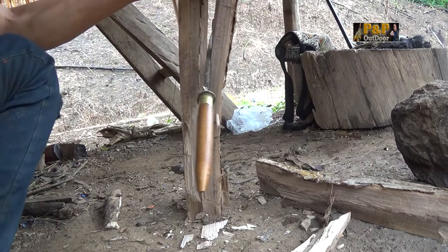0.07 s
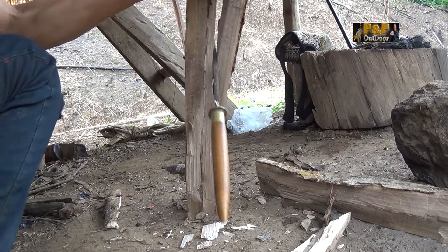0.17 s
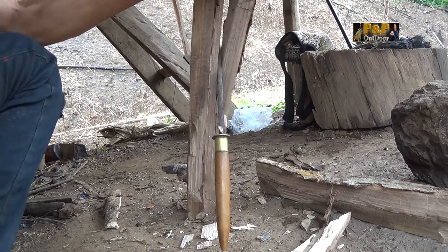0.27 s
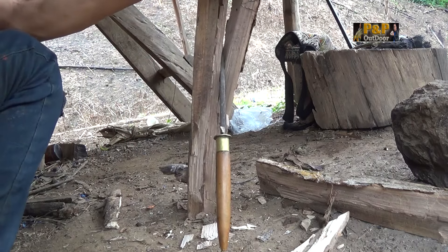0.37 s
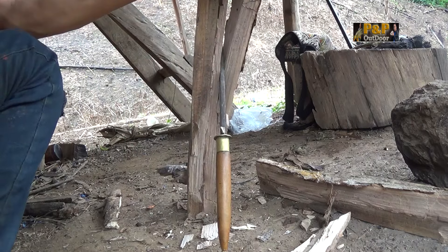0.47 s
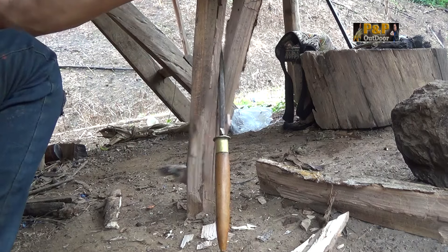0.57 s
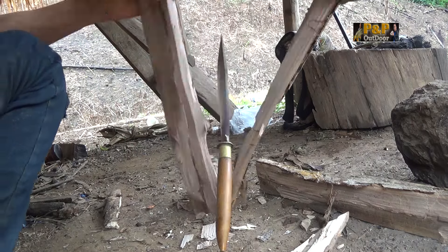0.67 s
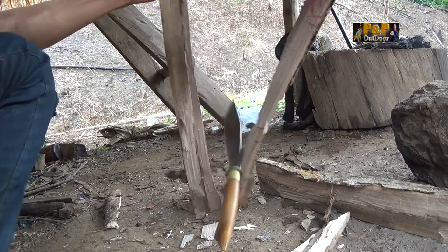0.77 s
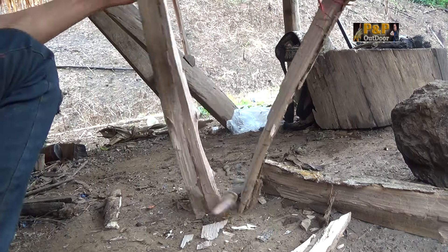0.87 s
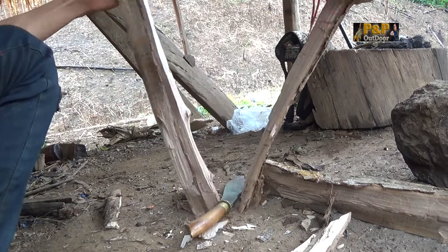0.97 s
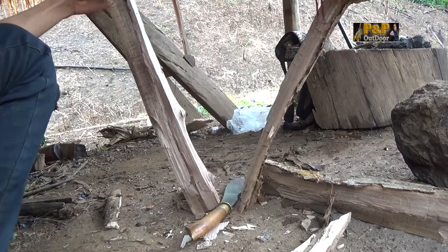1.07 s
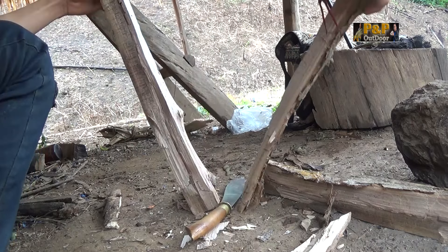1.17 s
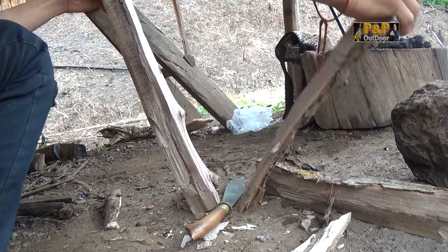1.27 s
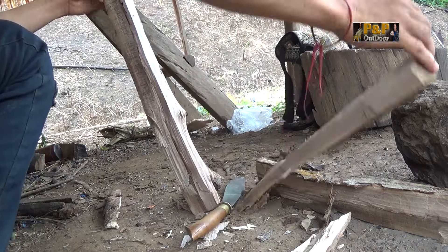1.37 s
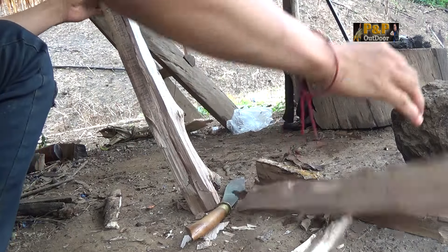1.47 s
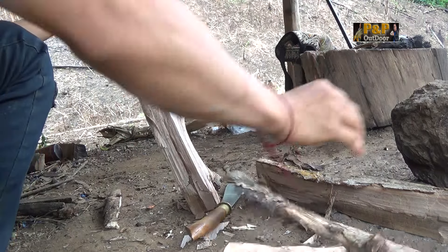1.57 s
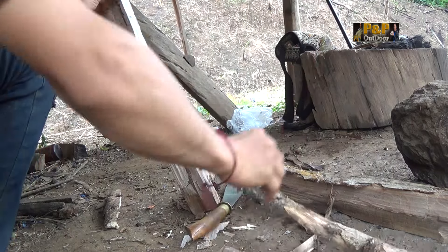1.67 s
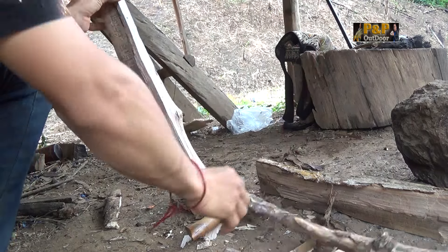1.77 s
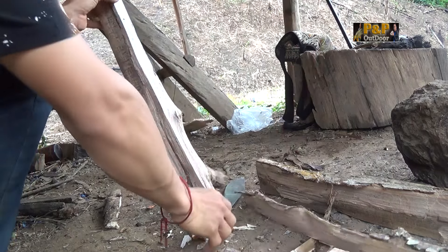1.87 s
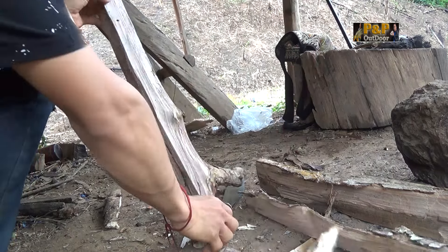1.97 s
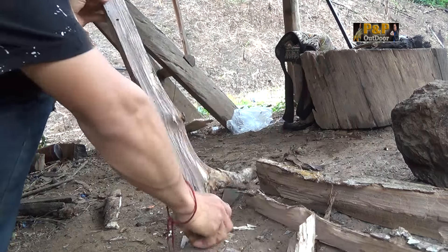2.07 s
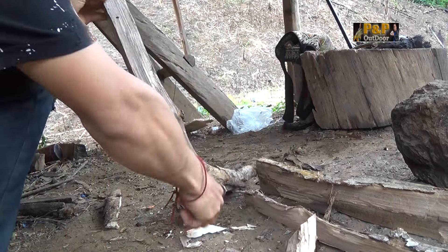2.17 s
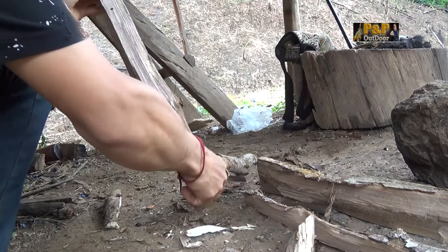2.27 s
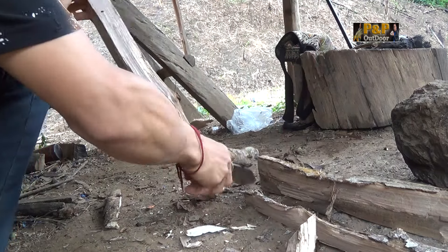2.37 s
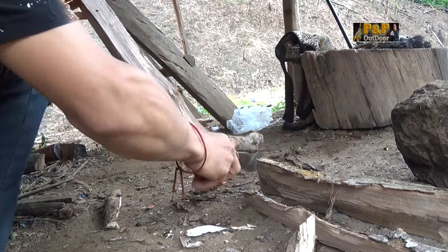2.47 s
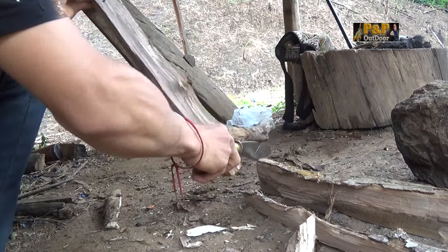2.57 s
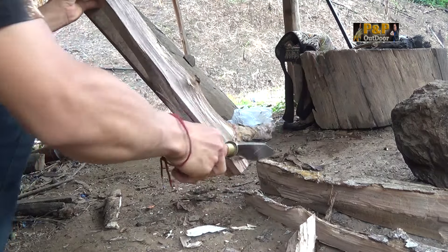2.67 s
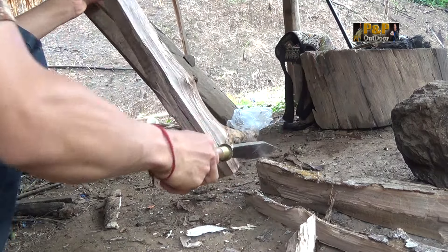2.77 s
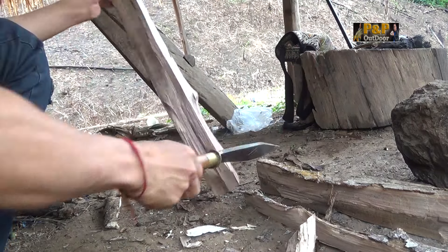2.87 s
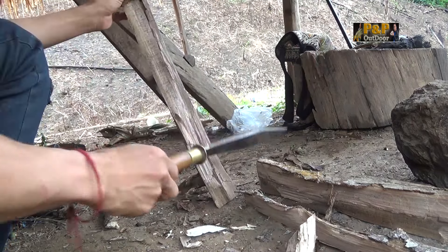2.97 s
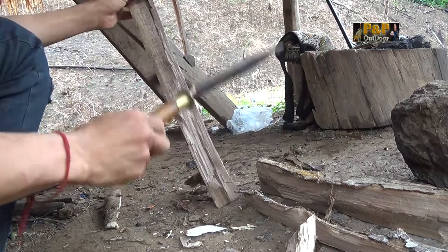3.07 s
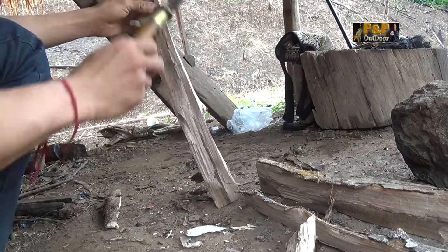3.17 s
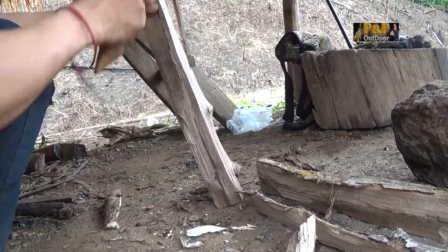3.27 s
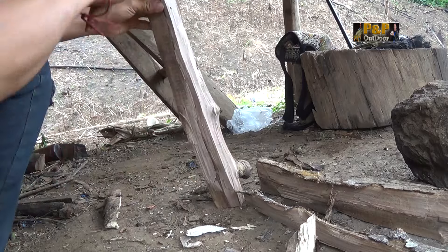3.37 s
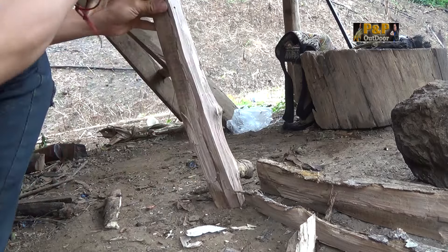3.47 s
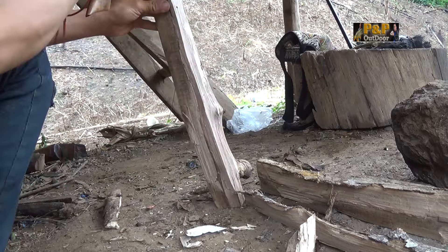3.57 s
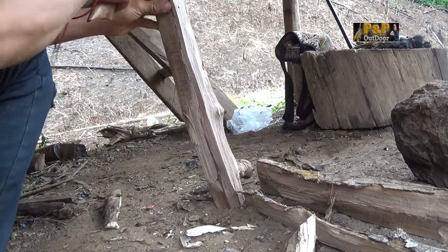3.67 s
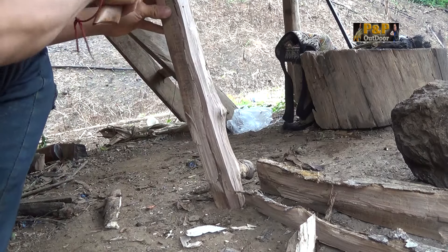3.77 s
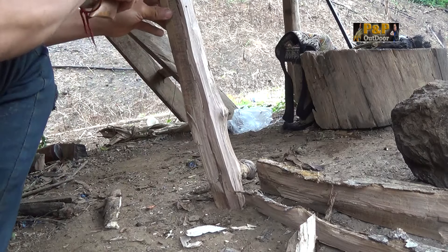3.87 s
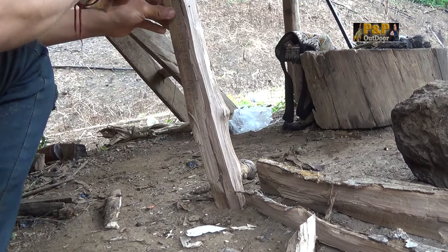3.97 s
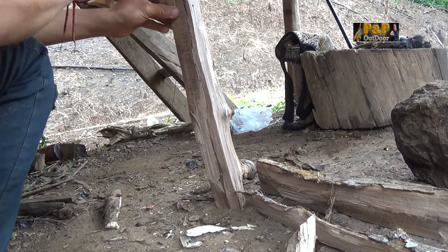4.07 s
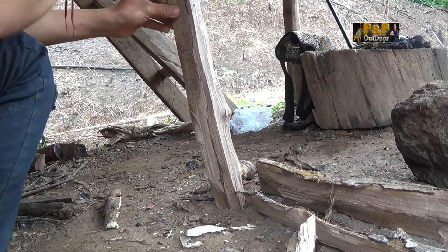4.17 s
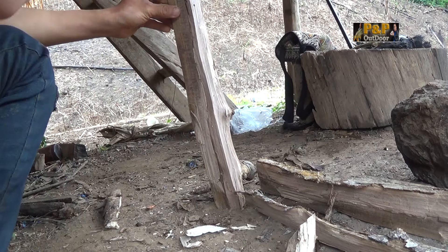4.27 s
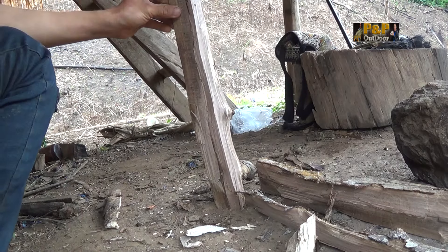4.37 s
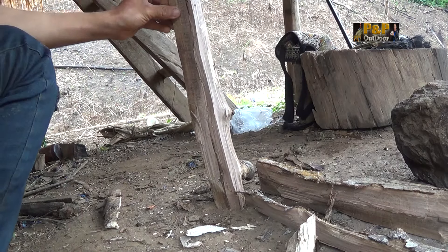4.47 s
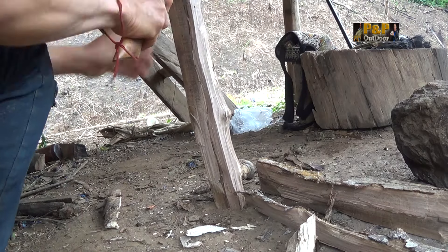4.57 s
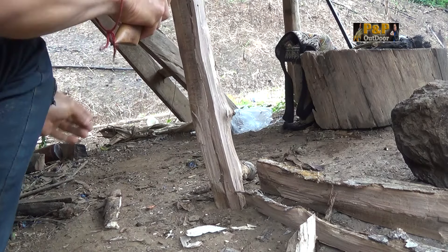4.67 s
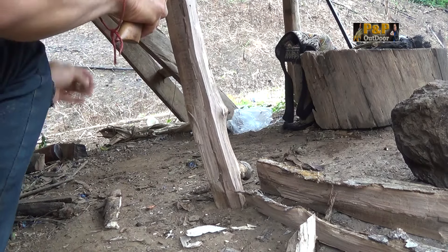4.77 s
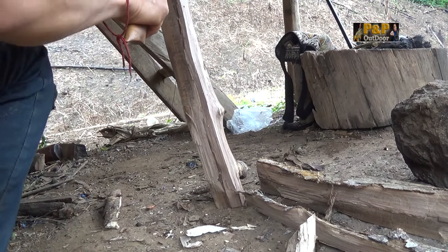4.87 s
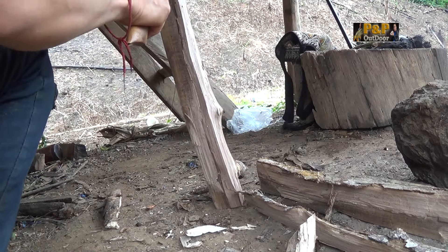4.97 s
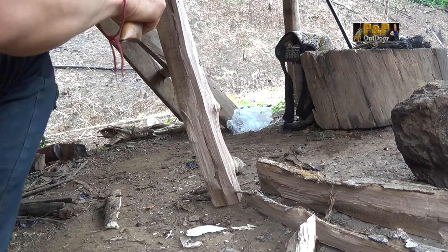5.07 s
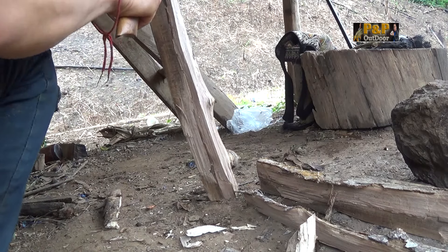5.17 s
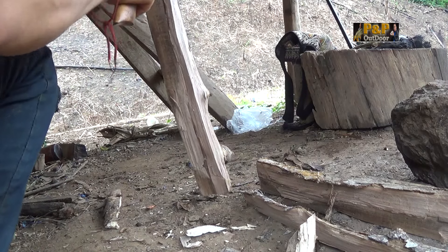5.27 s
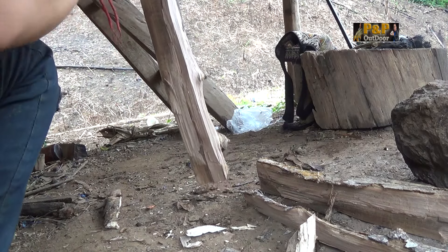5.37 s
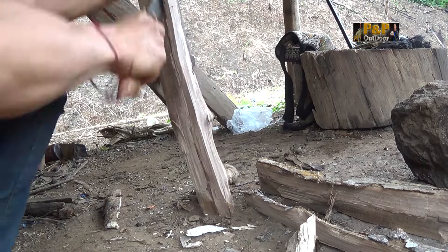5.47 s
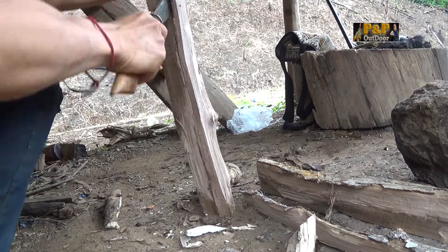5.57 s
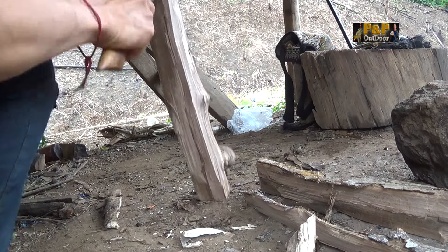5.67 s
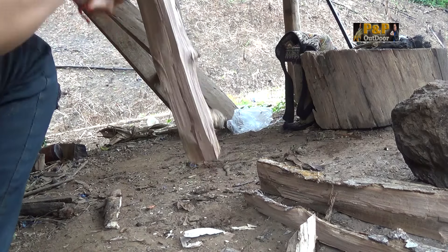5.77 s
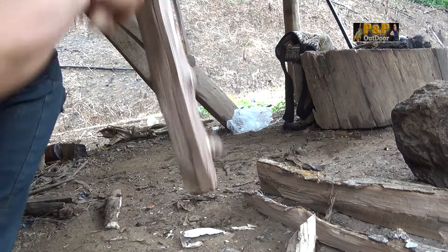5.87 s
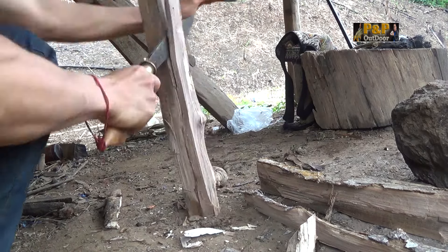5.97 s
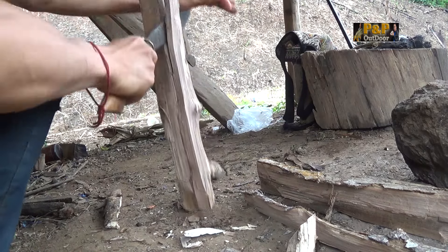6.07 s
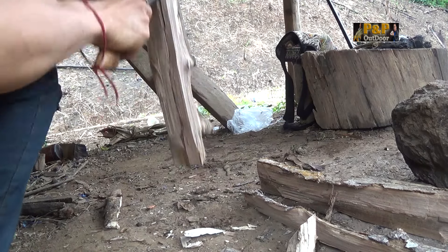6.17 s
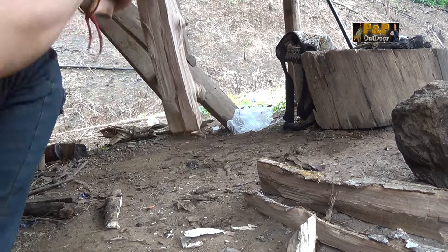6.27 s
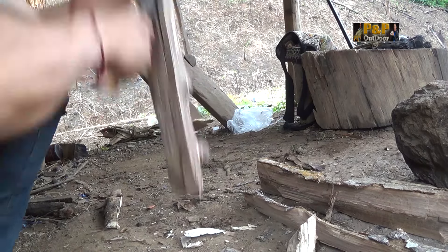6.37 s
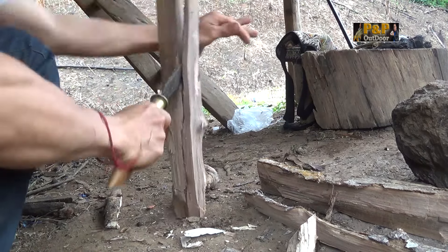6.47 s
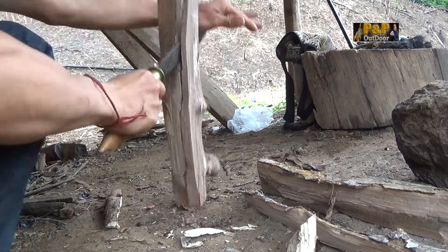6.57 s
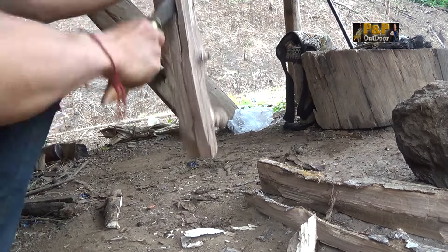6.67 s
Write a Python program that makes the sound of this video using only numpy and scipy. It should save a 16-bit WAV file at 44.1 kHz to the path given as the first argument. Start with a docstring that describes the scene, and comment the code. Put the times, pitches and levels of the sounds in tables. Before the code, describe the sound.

A blade slips through dry wood in jerky snaps, the wood tears open, and a flurry of hollow knocks follows. A dropped half lands in a loud tumbling clatter, settling into smaller taps. Faint steel scrapes, a wooden clack and a sleeve swish come next, then a low bump on soil. Finally four sharp chops, each with short fibre crackle and dull ground thud. Near microphone in a dry open yard, light steady hiss.

```python
"""A heavy knife splits firewood outdoors: each blow is an impact force exciting the modes of blade or board.
The blade slips and crackles in the split, the halves tear apart, and one falls and clatters on the woodpile.
The knife is picked up, the other half is set on the dirt, and four chops drive the blade into it.
Damped swings make the ground thuds, and showers of small catches make the rubbing and scraping.
Shaped noise makes the swishes and the air's hiss, over a thin whine; decaying noise scatters the contacts."""
import sys
import numpy as np
from scipy import signal
from scipy.fft import rfft, irfft
from scipy.io import wavfile
from scipy.ndimage import uniform_filter1d, minimum_filter1d

SR = 44100
rng = np.random.default_rng(int(sys.argv[2]) if len(sys.argv) > 2 else 0)


def master(y):
    """Save y as 16-bit WAV."""
    cut = np.clip(np.atleast_2d(y).T, -1, 1)
    pcm = np.round(cut * 32767)  # scale
    wavfile.write(sys.argv[1], SR, pcm.astype(np.int16))


N = 295911
LENGTH, BLOW_SAMPLES = 8192, 441  # samples: one short sound, and the 10 ms its level refers to
HZ = abs(np.fft.fftfreq(LENGTH, 1 / SR))

# Levels of blows are those of their ringing middle, before the gain of the whole layer.
# Boards striking wood or ground. Each row: start in seconds, level in dB, body in dB re level,
# edge in dB re level, contact t60 in seconds, body pitch in Hz, ground thud in dB.
KNOCKS = [(0.3555, -22.5, -6, -3, 0.012, 553, -25), (0.7035, -31.5, 0, -13, 0.022, 820, -55),
          (0.7314, -29.5, 3.5, -9, 0.054, 527, -19.5), (0.7745, -30, -3, 1, 0.095, 920, -36),
          (0.8506, -21.5, -7.5, -13, 0.045, 775, -42), (0.8785, -37, 1.5, -10, 0.12, 356, -36),
          (0.9085, -22, -6, -10, 0.12, 830, -33.5), (0.9584, -30, 0.5, -4, 0.17, 500, -32),
          (1.015, -28.5, -4, 2, 0.085, 615, -32.5), (1.078, -42, -2.5, -2, 0.023, 430, -38.5),
          (1.5598, -20, -2, -2.5, 0.025, 585, -31.5), (1.613, -20, -5.5, -3, 0.02, 880, -30),
          (1.6255, -16, -8, -3, 0.028, 720, -23.5), (1.6635, -24, -0.5, -11, 0.039, 546, -35),
          (1.7412, -25, 0.5, -12, 0.031, 780, -30), (1.7495, -28, -13, -5, 0.034, 590, -50),
          (1.792, -36, -7, -20, 0.04, 700, -55), (1.8022, -33, 4, -27, 0.01, 1170, -55),
          (1.928, -28, -6.5, -12, 0.028, 920, -40), (1.973, -33, 3, -3, 0.031, 390, -37),
          (2.007, -34, -4.5, -4, 0.061, 463, -31.5), (2.0955, -27.5, 1, -4.5, 0.028, 456.4, -27.5),
          (2.127, -44.5, 19.5, -12, 0.02, 398, -46), (2.16, -32.5, -0.5, -9, 0.08, 358, -36),
          (2.234, -33.5, -4.5, -2, 0.092, 417, -36.5), (3.003, -34, 6, -2, 0.058, 425, -18),
          (3.7774, -33, 6.5, -6, 0.043, 660, -28)]
# Chops driving the blade in. Each row: start in seconds, impact in dB, thud in dB, thud pitch in Hz,
# crackle in dB, crackle edge in dB re crackle, bite length in seconds, release t60 in seconds.
CHOPS = [(4.6212, -14.5, -24.5, 210, -23, 3.5, 0.013, 0.08), (5.5282, -25, -15, 160, -25, 8.5, 0.043, 0.03),
         (5.9865, -23, -18.5, 210, -27.5, 7.5, 0.027, 0.11),
         (6.4808, -26, -11.5, 215, -26, 6, 0.018, 0.075)]
# Modes of a split board. Each row: frequency in Hz before stretching, mean weight in dB, t60 in seconds.
BOARD_MODES = [(265, -9, 0.017), (490, -7, 0.1), (555, -12, 0.044), (760, -1.5, 0.078), (960, 6, 0.019),
               (1070, -4.5, 0.028), (1418, -0.5, 0.034), (1772, -5.5, 0.055), (2210, 4, 0.012),
               (2780, -7, 0.029), (2940, 2.5, 0.023), (3620, 1, 0.029), (4004, -1.5, 0.035),
               (4813, 6.5, 0.021), (5580, 2, 0.026)]
# Modes of the blade pinched in the wood. Each row: frequency in Hz before stretching,
# mean weight in dB, t60 in seconds.
BLADE_MODES = [(2150, -20, 0.047), (3370, -3, 0.028), (3680, 6.5, 0.021), (3930, 7.5, 0.019),
               (4620, 11, 0.01), (5500, -6, .02), (6760, -8, .03), (7880, -15, 0.06), (10200, -23, 0.024),
               (10610, 8.5, 0.017)]
# Colour of rubbing. Each row: frequency in Hz, gain in dB.
RUB_COLOUR = [(30, -43), (150, 4.5), (500, 4), (1400, 1), (3000, 2.5), (7000, -1), (11000, -3),
              (16000, -31)]

BODY_HZ = 523  # body pitch of a blow that has none of its own
BOARD_HZ = 1420  # the board's strongest mode is moved here for knocks and clacks
BLADE_RINGING = .3  # gain of the blade's modes beside the direct force
THUD_REFERENCE_DB = -29.5


def amp(db):
    """Decibels to amplitude ratio: 20 dB is a factor of ten."""
    return 10 ** (np.asarray(db) / 20)


def fade(t, t60):
    """Exponential damping: the amplitude falls by 60 dB in t60."""
    return amp(-60 * t / t60)


def unit(x):
    """Energy normalisation: the sum of squares becomes 1."""
    return x / np.sqrt(np.sum(x ** 2) + 1e-20)


def blow_level(x, db):
    """Equal energy: a short sound gets the energy of 10 ms at this level."""
    return unit(x) * np.sqrt(BLOW_SAMPLES) * amp(db)


def read(points, hz):
    """Interpolation on a log-frequency axis, where equal steps are equal musical intervals."""
    f, value = np.transpose(points)
    return np.interp(np.log(hz + 1e-9), np.log(f), value)


def colour(points, stretch=1):
    """Spectral envelope: gain over HZ of a table in dB, its frequencies multiplied by stretch."""
    return amp(read(points, HZ / stretch))


def add(mix, s, sound):
    """Superposition: a sound joins the mix at time s."""
    part = mix[max(round(s * SR), 0):][:len(sound)]
    part += sound[:len(part)]


def causal(gain):
    """Minimum-phase impulse response: the log gain's Hilbert transform gives the phase."""
    return np.fft.ifft(np.exp(np.conj(signal.hilbert(np.log(gain + 1e-9))))).real


def through(x, response):
    """Linear filtering by convolution with an impulse response, keeping the length."""
    return signal.fftconvolve(x, response)[:len(x)]


def ring(modes, stretch, spread_db):
    """Modal superposition: damped sines, weighted differently by each point of impact."""
    hz, db, t60 = np.transpose(modes)[:, :, None]
    t = np.arange(LENGTH) / SR
    weight = amp(db + spread_db * rng.standard_normal(hz.shape))
    weight = weight * rng.choice([-1, 1], hz.shape)
    return unit((weight * fade(t, t60) * np.sin(2 * np.pi * hz * stretch * t)).sum(0))


def contact(t60, crunch, grain_db):
    """Impulsive contact force: a sharp first touch, then a dying shower of tiny fibre breaks."""
    t = np.arange(LENGTH) / SR
    sizes = amp(grain_db * np.minimum(rng.exponential(1, LENGTH), 4))
    sizes = sizes * (rng.random(LENGTH) < .3)
    force = crunch * unit(sizes * rng.standard_normal(LENGTH) * fade(t, max(t60, .002)))
    force[0] += 1
    return force


def strikes(rows, modes, ringing, crunch, grain_db, tilt_db, edge_tilt_db, spread_db, detune):
    """Source and resonator: each contact force is heard directly and through the modes it excites."""
    # Hollow part of a blow. Each row: multiple of the body pitch, gain in dB.
    hollow = [(.06, -47), (.3, -17.5), (.62, -3), (.8, 0.5), (1.15, -1), (1.4, 0.5), (2.4, -9), (5, -51)]
    # Ringing middle, before its tilt. Each row: frequency in Hz, gain in dB.
    middle_points = [(5, -130), (100, -65), (400, -57), (850, -9.5), (1300, 2.5), (3000, 7.5), (5500, -4),
                     (7000, -35), (11000, -47.5)]
    # Sharp edge, before its tilt. Each row: frequency in Hz, gain in dB.
    edge_points = [(5, -150), (200, -85), (2500, -13.5), (4800, 0), (6300, 1), (10500, 1), (13000, -3),
                   (16000, -13)]
    out = np.zeros(N)
    octaves = np.log2(HZ + 1)
    middle = colour(middle_points) * amp(tilt_db * octaves)  # tilts in dB per octave
    edge = colour(edge_points) * amp(edge_tilt_db * octaves)
    main_hz = max(modes, key=lambda mode: mode[1])[0]  # the mode with the greatest weight
    for s, db, body_db, edge_db, t60, *pitches in rows:
        # a row without pitches of its own rings a little differently each time
        mode_hz, body_hz = pitches or (main_hz * (1 + detune * rng.uniform(-1.18, 1)), BODY_HZ)
        force = contact(t60, crunch, grain_db)
        sound = force + ringing * through(force, ring(modes, mode_hz / main_hz, spread_db))
        # body and edge get their energies relative to the middle's
        power = abs(np.fft.fft(sound)) ** 2
        ranges = (middle, 0), (colour(hollow, body_hz), body_db), (edge, edge_db)
        gain_squared = sum((amp(rel_db) * shape) ** 2 / np.mean(power * shape ** 2)
                           for shape, rel_db in ranges)
        blow = through(sound, causal(np.sqrt(gain_squared)))
        add(out, s, amp(db) * np.sqrt(BLOW_SAMPLES) * blow)
    return out


def thuds(rows, t60=0.029, rise=0.0014, rattle=0.5, crumble_t60=0.072, lowest_hz=58, order=4):
    """Heavily damped oscillation: the ground takes the weight in a few swings while soil crumbles."""
    # Crumbling soil. Each row: multiple of the thud's pitch, gain in dB.
    soil = [(.15, -17), (.4, -9), (.8, 0), (1.7, -1), (2.8, -17), (7, -38.5)]
    out, t = np.zeros(N), np.arange(LENGTH) / SR
    for s, db, hz in rows:
        swing = -np.sin(2 * np.pi * hz * t) * fade(t, t60) * (1 - np.exp(-t / rise))
        crumble = rng.standard_normal(LENGTH) * fade(t, crumble_t60)
        crumble = through(crumble, causal(colour(soil, hz)))
        add(out, s, blow_level(unit(swing) + rattle * unit(crumble), db))
    return signal.sosfilt(signal.butter(order, lowest_hz, "high", fs=SR, output="sos"), out)


def swells(rows):
    """Friction follows speed: each movement of a hand swells and fades as a Gaussian."""
    t = np.arange(N) / SR
    return sum(amp(db) * np.exp(-((t - s) / half) ** 2) for s, db, half in rows)


def flurry(start, length, first_db, last_db, per_s, jitter=.3, spread_db=2, size=64):
    """Jittered point process: uneven contacts whose level slides from first to last; rows (s, dB)."""
    late, loud = rng.uniform(-1, 1, (2, size))
    count = min(max(round(length * per_s), 1), size)
    rows = []
    for k, db in enumerate(np.linspace(first_db, last_db, count)):
        delay = jitter * late[k] * (k > 0)
        rows.append((start + (k + delay) * length / count, db + spread_db * loud[k]))
    return rows


def rubbing(per_s=3000, grain_db=2.5, clump_db=3, ringing=.25):
    """Stick-slip friction: splinters and grit catch in clumps of grains and faintly ring the board."""
    # Strokes of wood and knife. Each row: centre in seconds, peak level in dB, half length in seconds.
    strokes = [(0, -50, 0.066), (.31, -43.5, .06), (.69, -33, .04), (.77, -36.5, .035), (.98, -47, .07),
               (1.69, -45, 0.084), (2.05, -51, .17), (2.32, -47, .08), (2.6, -47, 0.16), (2.74, -45, .035)]
    grains = (rng.random(N) < per_s / SR) * rng.standard_normal(N)
    grains = grains * amp(grain_db * np.minimum(rng.exponential(1, N), 4))
    # the grip catches and lets go every few hundredths of a second
    grip = uniform_filter1d(uniform_filter1d(rng.standard_normal(N), size=500), size=300)
    grains = grains * amp(clump_db * grip / grip.std())
    grains = grains + ringing * through(grains, ring(BOARD_MODES, 0.94, 2.5))
    grains = through(grains, causal(colour(RUB_COLOUR)))
    return unit(grains) * np.sqrt(N) * swells(strokes)


def air():
    """Partly coherent noise: soft outdoor hiss, with a thin electronic whine that swells along with it."""
    # Spectrum of the hiss. Each row: frequency in Hz, relative density in dB per Hz.
    spectrum = [(15, -37), (25, -7), (177, -1), (403, -2), (448, -3), (554, 0.5), (666, -4), (761, -1),
                (1130, -7), (1290, -4), (3350, -9), (6000, -7), (6670, -3), (8240, -13), (14000, -17)]
    # Level of the hiss. Each row: time in seconds, level in dB.
    levels = [(.5, -44.5), (.8, -48), (1.3, -49.5), (1.7, -45), (3.4, -44), (4.58, -45), (4.68, -49.5)]
    # Likeness of the two channels. Each row: frequency in Hz, coherence from 0 to 1.
    likeness = [(60, 0.91), (180, 0.87), (550, 0.43), (1650, 0.5), (4970, 0.66), (15000, 1)]
    whine_hz, whine_db = 15735, -63  # the level where the hiss is softest
    hz, t = np.fft.rfftfreq(N, 1 / SR), np.arange(N) / SR
    a, b = rfft(rng.standard_normal((2, N)))
    same = np.clip(read(likeness, hz), 0, 1)
    channels = np.array([a, same * a + np.sqrt(1 - same ** 2) * b])
    hiss = irfft(channels * amp(read(spectrum, hz)), N)
    hiss = unit(hiss) * np.sqrt(2 * N)
    swell_db = np.interp(t, *np.transpose(levels))
    whine = np.sqrt(2) * np.sin(2 * np.pi * whine_hz * t) * amp(whine_db - swell_db.min())
    return (hiss + whine) * amp(swell_db)


def ticking(body_db=-6, t60=0.018):
    """Light impacts excite modes weakly: grit and splinters tick, and the blade pings once."""
    # Faint ticks. Each row: start in seconds, level in dB, edge in dB re level.
    ticks = [(.039, -42.5, -11), (.081, -55, 11), (.248, -46, 1), (.297, -46.5, 4), (.4093, -41, 5.5),
             (1.207, -48.5, 10), (2.2805, -38.5, 4), (3.451, -53, 11), (5.685, -52, 2), (6.335, -59, 8.5),
             (6.588, -49, -2)]
    # The blade's ping after the last chop: start in seconds, level in dB, pitch in Hz, t60 in seconds.
    ping = (6.588, -43, 5728, 0.05)
    rows = [(s, db, body_db, edge_db, t60) for s, db, edge_db in ticks]
    out = strikes(rows, BOARD_MODES, ringing=0.22, crunch=1.6, grain_db=4, tilt_db=1.0,
                  edge_tilt_db=2.0, spread_db=4, detune=0.15)
    s, db, hz, ping_t60 = ping
    t = np.arange(LENGTH) / SR
    add(out, s, blow_level(np.sin(2 * np.pi * hz * t) * fade(t, ping_t60), db))
    return out


def clacking(body_db=-3, body_hz=1000, lowest_hz=680, order=3):
    """High-passed impacts: the knife clacks on wood, and the wood cracks once under the last chop."""
    # Knife against wood, and one crack of the wood splitting under the last chop (6.5162).
    # Each row: start in seconds, level in dB, edge in dB re level, contact t60 in seconds.
    clacks = [(6.5162, -38, 8, 0.02), (0.352, -34, 5, 0.06), (0.8665, -35, 3, 0.05), (0.9145, -21, 1, 0.04),
              (1.007, -28, 11.5, 0.011), (1.6036, -29, 10, 0.049), (1.8512, -42, 11, 0.023),
              (2.4235, -43, -2, 0.03), (2.4504, -26.5, -9.5, 0.02), (2.5333, -17.5, -6.5, 0.013),
              (2.787, -40, -16, 0.045), (2.9445, -38.5, -6, 0.05), (3.0374, -35.5, -14, 0.01),
              (5.283, -41.5, -20.5, 0.016)]
    rows = [(s, db, body_db, edge_db, t60, BOARD_HZ, body_hz) for s, db, edge_db, t60 in clacks]
    out = strikes(rows, BOARD_MODES, ringing=0.41, crunch=2.8, grain_db=2, tilt_db=-2.0,
                  edge_tilt_db=-5.5, spread_db=2.0, detune=0)
    return amp(0.3) * signal.sosfilt(signal.butter(order, lowest_hz, "high", fs=SR, output="sos"), out)


def knocking(detune=.03, rattle_body_db=-1.5, rattle_t60=0.055):
    """Struck-plate modes: boards knock, each time at a slightly different pitch, and loose pieces rattle."""
    # Loose pieces rocking and settling. Each row: start in seconds, length in seconds, first level in dB,
    # last level in dB, knocks per second, edge in dB re level.
    rattles = [(0.7625, 0.068, -35, -37, 30, -2), (1.6335, 0.036, -28, -35, 55, -10),
               (2.024, 0.075, -39.5, -39.5, 40, -3), (2.629, 0.03, -42, -42, 30, -6)]
    rows = []
    for s, db, body_db, edge_db, t60, body_hz, _ in KNOCKS:
        mode_hz = BOARD_HZ * (1 + detune * rng.uniform(-1.05, 1))
        rows.append((s, db, body_db, edge_db, t60, mode_hz, body_hz))
    for *rattle, edge_db in rattles:
        rows += [(s, db, rattle_body_db, edge_db, rattle_t60, BOARD_HZ, BODY_HZ)
                 for s, db in flurry(*rattle)]
    return amp(-0.4) * strikes(rows, BOARD_MODES, ringing=0.5, crunch=2.5, grain_db=2, tilt_db=-2.0,
                               edge_tilt_db=-7, spread_db=2.0, detune=0)


def landing(reference_hz=165, octaves_per_db=0.02):
    """Load-dependent resonance: under each knock, a heavier landing sinks deeper and thuds lower."""
    rows = []
    for s, *_, db in KNOCKS:
        rows.append((s, db, reference_hz * 2 ** (octaves_per_db * (THUD_REFERENCE_DB - db))))
    return thuds(rows, lowest_hz=66)


def tearing(body_db=-29.5, t60=0.015):
    """Fracture as a burst of impulses: the blade slips in jerks and fibres give way between them."""
    # The blade slipping in the split. Each row: start in seconds, level in dB, edge in dB re level,
    # contact t60 in seconds.
    slips = [(0.5335, -21, 1.5, 0.014), (0.572, -24, 5.5, 0.013), (0.577, -27, -1, 0.02),
             (0.606, -31, -2, 0.04), (0.6202, -34, 10, 0.014), (0.626, -28.5, 8, 0.016),
             (0.6392, -19, -3, 0.03), (0.675, -25, 7.5, 0.057), (0.6888, -41, 16, 0.009)]
    # The split opening, first slowly, then in one rip. Each row: start in seconds, length in seconds,
    # first level in dB, last level in dB, snaps per second, edge in dB re level.
    tears = [(0.502, 0.028, -43.5, -40, 140, 2.5), (0.565, 0.13, -38, -35, 125, 6),
             (0.653, 0.018, -20, -14, 340, -1)]
    rows = [(s, db, body_db, edge_db, contact_t60) for s, db, edge_db, contact_t60 in slips]
    for *tear, edge_db in tears:
        rows += [(s, db, body_db, edge_db, t60) for s, db in flurry(*tear, jitter=.4, spread_db=3)]
    return amp(-1.0) * strikes(rows, BLADE_MODES, BLADE_RINGING, crunch=4.0, grain_db=3.5, tilt_db=4.0,
                               edge_tilt_db=-3, spread_db=5.5, detune=0.072)


def scraping(per_s=1500, ringing=1.3):
    """Stick-slip excitation: the knife's edge catches in tiny jerks that set the steel ringing."""
    # The free knife along wood. Each row: centre in seconds, peak in dB before ringing and layer gain,
    # half length in seconds.
    scrapes = [(2.25, -42, .015), (2.305, -42.5, .014), (2.43, -42, .012), (2.755, -44, .025)]
    # Modes of the steel. Each row: frequency in Hz, mean weight in dB, t60 in seconds.
    steel = [(1420, -2, .12), (2900, 0, .12), (4050, 0, .12), (4750, -2, .1), (5600, -2, .1),
             (6400, -2, .1), (8000, -2, .08), (9500, -5, .08), (10350, -6, .07)]
    catches = (rng.random(N) < per_s / SR) * rng.standard_normal(N)
    catches = unit(catches) * np.sqrt(N) * swells(scrapes)
    force = through(catches, unit(causal(colour(RUB_COLOUR))))
    return amp(-3) * (force + ringing * through(force, ring(steel, 1, 1.5)))


def swishes():
    """Broadband friction noise: sleeve and hand brush past, smooth and bright, swelling with each movement."""
    # Movements. Each row: centre in seconds, peak level in dB, half length in seconds.
    brushes = [(2.304, -46, 0.023), (2.359, -35, 0.006), (3.18, -44.5, 0.056), (6.13, -55, 0.066)]
    # Colour of the friction. Each row: frequency in Hz, relative density in dB per Hz.
    cloth = [(500, -32), (2000, -7), (3200, 0.5), (5500, 3.5), (8000, 4), (12000, -1), (16000, -14)]
    noise = through(rng.standard_normal(N), causal(colour(cloth)))
    return swells(brushes) * np.sqrt(N) * unit(noise)


def chopping():
    """Impact, fracture and release: each chop strikes, snaps fibres while the blade bites, and dies away."""
    chop_body_db, chop_edge_db, chop_t60 = -5.5, 3, 0.034  # body re thud, edge re impact, seconds
    snaps_per_s, snap_body_db, snap_t60 = 190, -9.5, 0.019
    bite_delay, release_db = 0.006, -1.5  # seconds after the impact; dB re crackle
    rows = []
    for start, impact_db, thud_db, _, crackle_db, edge_db, bite, release_t60 in CHOPS:
        # the hollow body follows the thud
        rows.append((start, impact_db, thud_db + chop_body_db - impact_db, chop_edge_db, chop_t60))
        snaps = flurry(start + bite_delay, bite - bite_delay, crackle_db, crackle_db, snaps_per_s,
                       jitter=.25, spread_db=2.5)
        rows += [(s, db, snap_body_db, edge_db, snap_t60) for s, db in snaps]
        rows.append((start + bite, crackle_db + release_db, snap_body_db, edge_db, release_t60))
    return amp(-0.78) * strikes(rows, BLADE_MODES, BLADE_RINGING, crunch=3.0, grain_db=2.5, tilt_db=-1.0,
                                edge_tilt_db=-2.5, spread_db=4, detune=0.056)


def pounding(rebound_s=0.0094, rebound_db=-26, rebound_hz=125, share=.4):
    """Rebound: each chop drives the board's foot into the dirt, where it lands twice."""
    blows = [(s, db, hz) for s, _, db, hz, *_ in CHOPS]
    # the second landing is a little harder after a heavier chop
    rebounds = [(s + rebound_s, rebound_db + share * (db - THUD_REFERENCE_DB), rebound_hz)
                for s, db, _ in blows]
    return amp(-.5) * thuds(blows + rebounds, t60=.027, rattle=0.54, crumble_t60=0.069, lowest_hz=48)


def yard(x, near_db, tail_db):
    """Diffuse scattering: ground and nearby logs scatter the sound at once; a faint tail follows."""
    # Decay of the tail. Each row: frequency in Hz, t60 in seconds.
    decay = [(100, 0.28), (400, 0.21), (2000, 0.18), (6000, 0.096), (14000, 0.063)]
    t = np.arange(2 * LENGTH) / SR
    out = []
    # each channel has its own scatter
    for noise, scatter in rng.standard_normal((2, 2, len(t))):
        hz, at, z = signal.stft(noise, SR, nperseg=256)
        tail = signal.istft(z * fade(at, read(decay, hz)[:, None]), SR, nperseg=256)[1][:len(t)]
        tail = tail * (1 - np.exp(-t / 0.0067))
        near = scatter * (rng.random(len(t)) < .1) * np.exp(-t / 0.0039)
        response = amp(near_db) * unit(near) + amp(tail_db) * unit(tail)
        out.append(x + through(x, response))
    return np.array(out)


def scene():
    """Superposition of blade, boards and ground in the open yard."""
    wood = rubbing() + ticking() + clacking() + knocking() + tearing()
    wood = wood + scraping() + swishes() + chopping()
    ground = landing() + pounding()
    return yard(wood, near_db=-11.0, tail_db=-21.0) + yard(ground, near_db=-30, tail_db=-21.5) + air()


def record(dry):
    """Peak limiting by a fast, smoothed gain, then band limiting by a linear-phase low-pass."""
    allowed = 1 / np.maximum(abs(dry).max(0), 1)
    limited = dry * uniform_filter1d(minimum_filter1d(allowed, size=41), size=41)
    low_pass = signal.firwin(601, 16100, window=("kaiser", 10), fs=SR)  # cutoff in Hz
    return signal.oaconvolve(limited, low_pass[None], "same", axes=1)


dry = scene()
out = record(dry)
master(out)
```